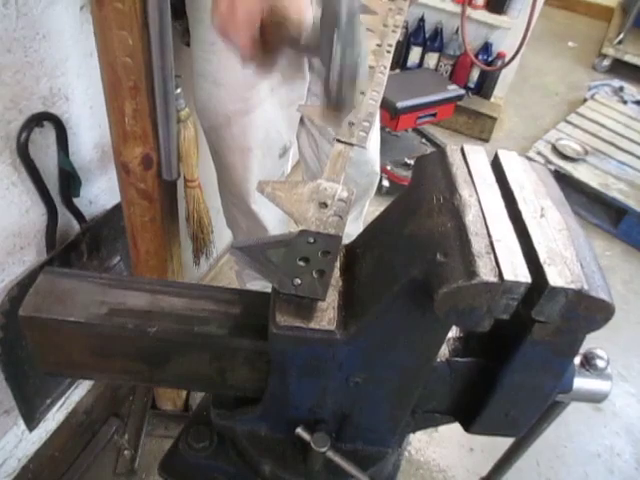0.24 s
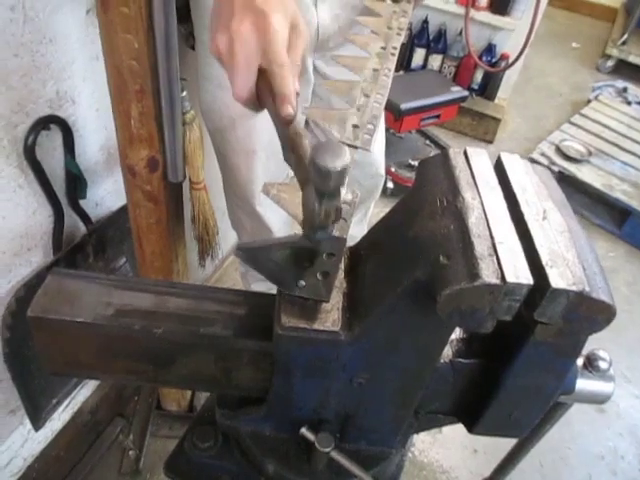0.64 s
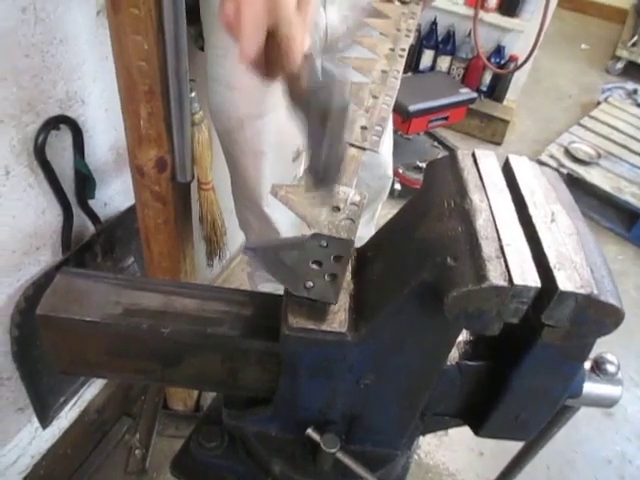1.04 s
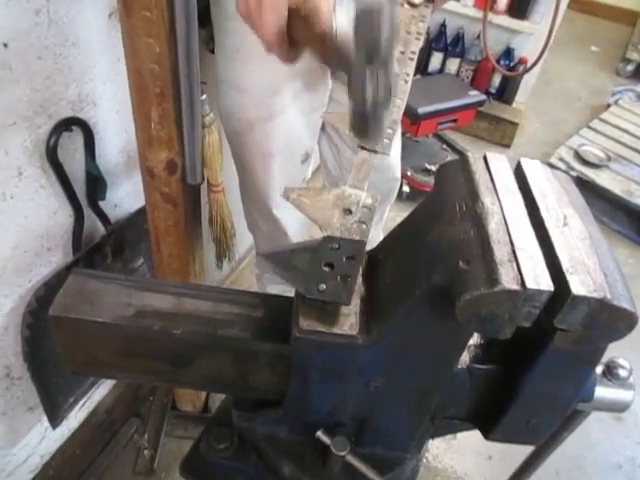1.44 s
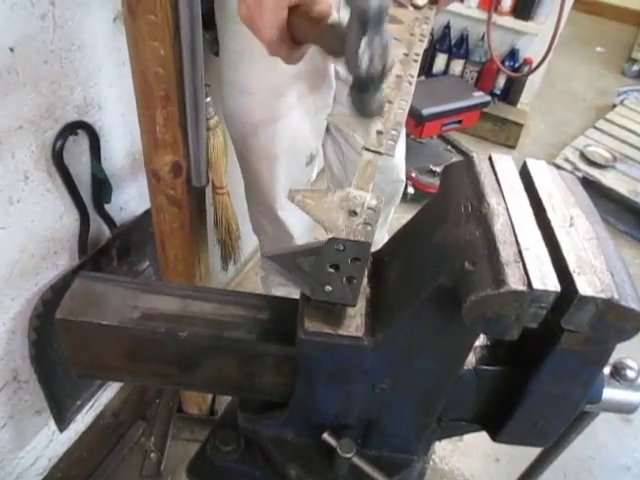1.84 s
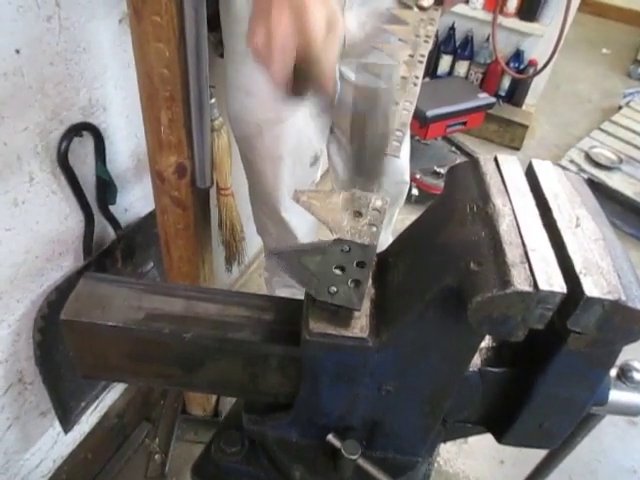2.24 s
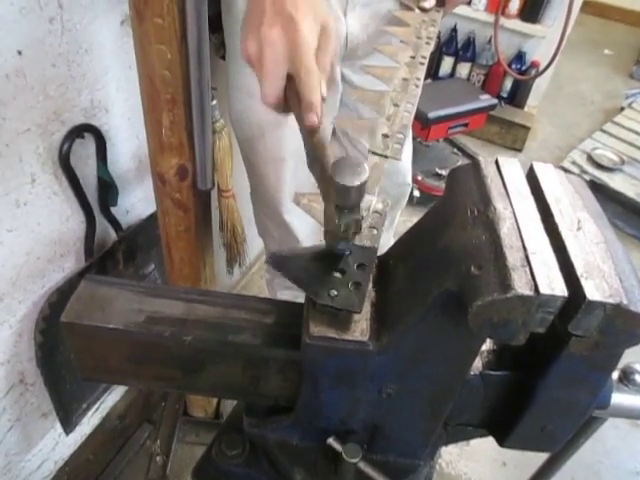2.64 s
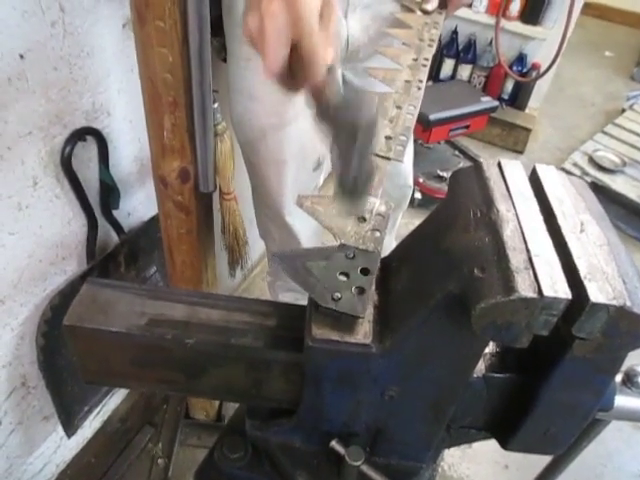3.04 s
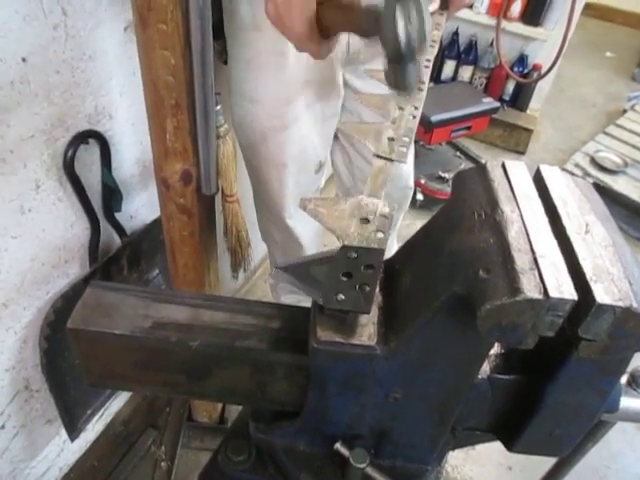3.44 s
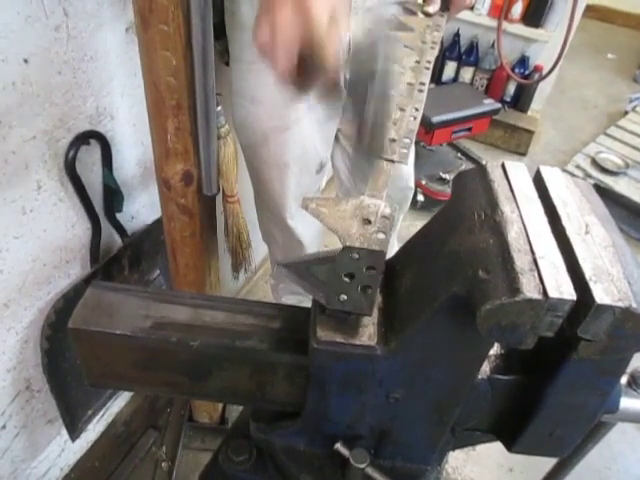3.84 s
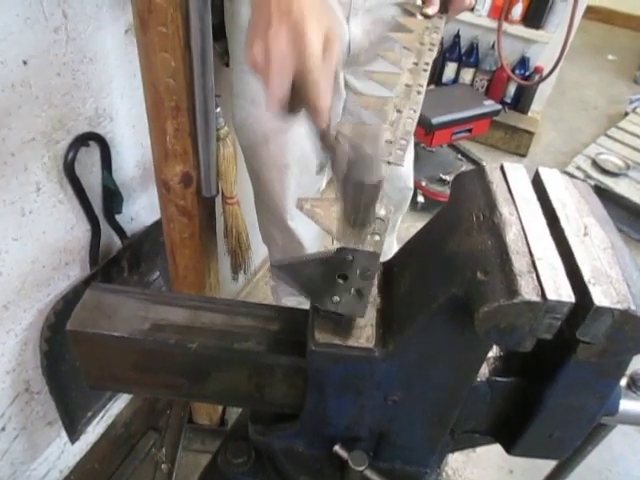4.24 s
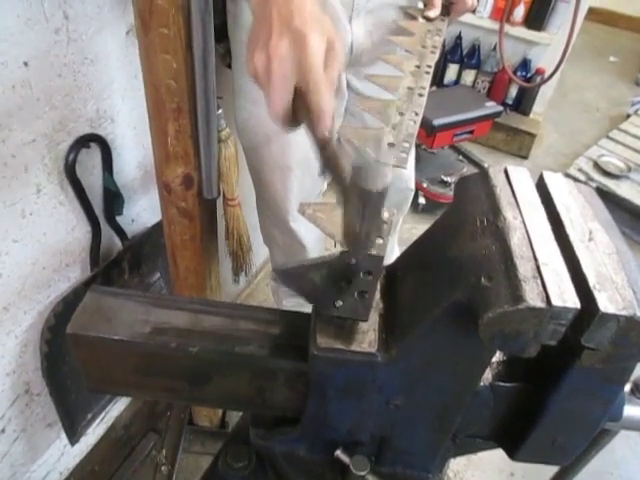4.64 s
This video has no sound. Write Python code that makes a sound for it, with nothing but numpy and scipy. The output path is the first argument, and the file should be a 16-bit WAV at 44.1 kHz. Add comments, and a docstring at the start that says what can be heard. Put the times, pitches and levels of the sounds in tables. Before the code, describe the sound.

A steel hammer beats a rivet in a blade resting on a heavy bench vise, roughly three blows a second. Each is a hard, bright crack with a short high ring and a low, solid thud beneath. The loose blade often slaps back with a small clink. Later blows rattle more. A hard-walled workshop answers each hit with overlapping reverberation; one close microphone, practically mono, faint hiss.

```python
"""Hard-walled workshop: a ball-peen hammer beats a steel rivet in a cutter blade laid on the flat of a bench vise.
Each blow is a filtered push with noise (crack), decaying sines (vise, bench, hammer head and blade)
and sparse ticks (chatter); the loose blade bounces and slaps back, and short scuffs precede some blows.
The room, decaying noise convolved with each blow, answers for most of a second.
A single microphone feeds both channels, over a faint hiss."""
import sys
import numpy as np
from scipy import signal
from scipy.fft import rfft, irfft
from scipy.io import wavfile
from scipy.ndimage import uniform_filter1d

SR = 44100
rng = np.random.default_rng(int(sys.argv[2]) if len(sys.argv) > 2 else 0)


def pcm_store(signal):
    """Save signal as 16-bit PCM."""
    levels = np.round(np.clip(np.atleast_2d(signal), -1, 1) * 32767)
    wavfile.write(sys.argv[1], SR, levels.astype(np.int16).T)


def invert_db(x):
    """Field ratio 10**(x/20) for x, a level in decibels (scalar or array-like)."""
    u = np.asarray(x, float) / 20
    return 10 ** u


N = 211486

# Hammer blows, the first still echoing at the start; levels relative.
# thud: how firmly the vise takes the blow; hardness: steel-on-steel sharpness; looseness: how free the blade sits;
# glance: how much the hammer skids, spraying noise instead of ring.
# start_s, crack_db, thud_db, hardness_db, looseness_db, glance_db
BLOW_EVENTS = [(-.29, -16, -24, -22, -6, -3), (0.0273, -20, -24, -4, -10, -0.5),
               (0.341, -11.5, -23.5, -13.5, -11, -10.5), (0.6481, -12.5, -25.5, -5, -17, -4.5),
               (0.9572, -13, -27.5, -5, -6, 1), (1.299, -12, -36, 0.5, 4, 11.5),
               (1.661, -9.5, -27, -5, -27, -2), (1.996, -14.5, -27.5, 0, -2, 3),
               (2.313, -10, -26, -1, -17, 1), (2.6313, -19.5, -28.5, 0, -2, -1),
               (2.95, -12.5, -28, -4.5, -4, 4.5), (3.279, -18, -29.5, 5, 8.5, 4),
               (3.6049, -11.5, -33.5, 2.5, 2, 11.5), (3.9263, -3, -31, 3, -10, 13),
               (4.3013, -13, -36, 1.5, 17.5, 3.5), (4.7003, -14, -33, 7, 4.5, 3.5)]
# Blade slapping back onto the vise: start_s, relative level_db, pitch_hz
SLAP_EVENTS = [(0.9853, -19.5, 3610), (1.3082, -42, 3020), (1.3382, -23.5, 4280), (1.346, -24.5, 4100),
               (1.697, -27.5, 3420), (1.706, -47, 3280), (2.0276, -21, 4180), (2.0402, -27.5, 4160),
               (2.347, -28, 3950), (2.6694, -67, 3220), (2.9756, -18, 4240), (3.3052, -28.5, 4600),
               (3.6104, -28, 3120), (3.9336, -22.5, 3030), (3.9533, -33, 4000), (4.3526, -23, 4010),
               (4.3595, -36, 3850), (4.7671, -37.5, 4380)]
# Short swelling scuffs of the steel just before some blows land: end_s, level_db
SCUFF_EVENTS = [(0.3422, -30), (1.2995, -48), (3.282, -48), (3.606, -35), (3.9265, -42), (4.7037, -21.5)]
# Hammer head and blade modes: pitch_hz, t60_s, twin_beat_hz
STEEL_MODES = [(1826, .5, 12), (2536, .07, 15), (4055, .06, 25), (4535, .55, 30), (6152, .2, 18),
               (6510, .12, 35), (8375, .3, 60), (10610, .12, 60), (11262, .15, 20), (12585, .12, 25),
               (12996, .15, 20), (13520, .1, 40)]
# Steel modes at zero hardness and looseness, in the same order: relative level_db
STEEL_LEVELS_DB = [-56.5, -45.5, -47, -60.5, -49.5, -41, -49, -50, -60.5, -63.5, -54.5, -67]
# Vise, bench and the room's lowest modes: pitch_hz, relative level_db, t60_s
BENCH_MODES = [(82, -13, 0.23), (129, -10, 0.22), (146, -9, 0.75), (159.3, -5.5, 0.47), (195.2, -3, 0.38),
               (210, -7.5, 0.9), (249.6, -4.5, 0.85), (279.6, -2.5, 0.58), (357, -8, 0.87),
               (402.5, -17, 1.6), (479, -8.5, 0.52), (622, -11, 0.73), (669, -5.5, 0.72), (703, -6, 1.03),
               (770, -2.5, 0.84), (783, -69, 0.11), (985, -1.5, 0.11)]
# Vise jaws and slide, quickly damped: pitch_hz, relative level_db, t60_s
VISE_MODES = [(274, -7.5, 0.075), (621, -7, 0.046), (760.6, -7, 0.05), (1194, -23, 0.2), (1426, -15, 0.023),
              (2077, -6.5, 0.023), (3280, -4.5, 0.033)]
# Crack filter: freq_hz, gain_db
CRACK_FILTER = [(40, -38.5), (120, -33), (270, -2), (500, 2), (760, 1.5), (1000, 4.5), (1300, 2.5),
                (1700, 3), (2120, 6.5), (3400, 8.5), (4400, 9.5), (5000, -1), (7000, -2.5), (12000, -16.5),
                (16000, -44)]
# Chatter and scuff spectrum: freq_hz, relative level_db
RATTLE_SPECTRUM = [(500, -7.5), (2000, -7), (3500, -2.5), (6000, -7), (10000, -9.5), (14000, -10),
                   (17000, -80)]
# Room decay: freq_hz, t60_s
ROOM_DECAY = [(100, 0.51), (420, 1), (1100, 0.63), (2900, 0.69), (7700, 0.57), (15000, 0.41)]
# Hiss common to both channels: freq_hz, relative density_db_per_hz
HISS_SPECTRUM = [(30, 2), (200, 1), (1000, -11), (5000, -13), (16000, -22.5)]
# Hiss of opposite sign in the two channels: freq_hz, relative density_db_per_hz
SIDE_HISS_SPECTRUM = [(100, -4), (1500, -9), (4000, -3), (8000, 2), (16000, 0)]
# Faint channel difference on spectral peaks, relative to the sound: freq_hz, gain_db
SIDE_GAIN = [(500, -56.5), (1400, -48), (2800, -68.5), (5600, -32), (10000, -22), (14000, -21)]

TOP_HZ = 15800
HISS_DB, SIDE_HISS_DB = -61.5, -69
# A mode at HARD_HZ follows hardness dB for dB; higher ones swing wider, by this power of pitch.
HARD_HZ, HARD_POWER = 7250, 0.43
BLADE_TOP_HZ = 2200  # modes below are the blade's, freed by looseness
PLACE_SD_DB = 4  # scatter from where the blow lands
KNOCK_OVER_THUD_DB = 11.5  # the vise's knock
SIZZLE_DB = -24  # splintering at zero glance
# Below, *_PER_LOOSE, *_PER_GLANCE and *_PER_SLAP are dB per dB; base values hold at zero.
CHATTER_DB, CHATTER_PER_GLANCE, CHATTER_PER_LOOSE = -40.5, 0.89, 0.5
SETTLE_S, SETTLE_PER_LOOSE = 0.019, 0.21  # chatter length
JOLT_DB, JOLT_PER_LOOSE = -36, 0.6
SLAP_KNOCK_DB, SLAP_KNOCK_PER_LOOSE = 3, 0.19
SLAP_SIZZLE_DB, SLAP_SIZZLE_PER_GLANCE = -8, 0.44
RERING_DB, RERING_PER_SLAP = 22, 0.66  # a slap rings the steel anew
TRAVEL_S = 0.00116  # to the microphone


def unit(x):
    """Scale to rms 1."""
    return x / np.sqrt(np.mean(x ** 2) + 1e-20)


def along(points, hz):
    """Interpolate (Hz, value) points on a log frequency axis."""
    f, v = np.transpose(points)
    return np.interp(np.log(hz + 1), np.log(f + 1), v)


def coloured(x, db_at):
    """Minimum-phase filter, via the folded cepstrum, with gain db_at(Hz)."""
    size = 4096
    gain = invert_db(db_at(np.fft.rfftfreq(size, 1 / SR)))
    cepstrum = irfft(np.log(gain), size)
    cepstrum[1:size // 2] *= 2
    cepstrum[size // 2 + 1:] = 0
    impulse = irfft(np.exp(rfft(cepstrum)), size)
    return signal.fftconvolve(x, impulse)[:len(x)]


def fade(t, t60_s):
    """Exponential decay, 60 dB in t60_s."""
    return invert_db(-60 * t / np.maximum(t60_s, .001))


def hiss(spectrum, level_db):
    """Steady background: Gaussian noise shaped to a spectrum, at a set rms."""
    return invert_db(level_db) * unit(coloured(rng.standard_normal(N), lambda hz: along(spectrum, hz)))


def room(x):
    """Echo by convolution with a fresh random noise tail for each blow, each frequency decaying at its own rate."""
    hz, t, z = signal.stft(rng.standard_normal(SR), SR, nperseg=256)
    decayed = z * fade(t, along(ROOM_DECAY, hz)[:, None])
    tail = signal.istft(decayed, SR, nperseg=256)[1][:SR]
    tail *= 1 - np.exp(-np.arange(SR) / SR / 0.00043)
    return signal.fftconvolve(x, tail / np.linalg.norm(tail))


def jolt(t, loose_db):
    """The microphone stand jumps: a short low sine, stronger with a loose blade."""
    level_db = JOLT_DB + JOLT_PER_LOOSE * loose_db
    return invert_db(level_db) * np.sin(2 * np.pi * 95 * t) * fade(t, 0.02)


def bench(t):
    """Heavy parts hum the same slightly unsteady modes at every blow."""
    hz, db, t60_s = np.transpose(BENCH_MODES)[..., None]
    size = invert_db(db + rng.normal(0, 0.31, hz.shape))
    walk = np.cumsum(rng.standard_normal((len(BENCH_MODES), len(t))), axis=1)
    drift = .012 * np.sqrt(hz / 500) * walk
    modes = size * fade(t, t60_s) * np.sin(2 * np.pi * hz * t + drift)
    return modes.sum(0) * (1 - np.exp(-t / 0.0017))


def graze(db, size):
    """Scuffed steel: a few ms of swelling noise."""
    scrape = unit(coloured(rng.standard_normal(size), lambda hz: along(RATTLE_SPECTRUM, hz)))
    return invert_db(db) * np.linspace(0, 1, size) * scrape


def chatter(t, loose_db, glance_db):
    """The loose blade clatters in sparse tiny ticks until it settles."""
    level_db = CHATTER_DB + CHATTER_PER_GLANCE * glance_db + CHATTER_PER_LOOSE * loose_db
    length_s = SETTLE_S * invert_db(SETTLE_PER_LOOSE * loose_db)
    struck = rng.random(len(t)) < .08
    ticks = struck * rng.standard_normal(len(t)) * invert_db(3 * rng.standard_normal(len(t)))
    ticks = unit(coloured(ticks, lambda hz: along(RATTLE_SPECTRUM, hz)))
    return invert_db(level_db) * ticks / (1 + (t / max(length_s, .005)) ** 5)


def slap(t, hz, loose_db, glance_db):
    """Flat steel on flat steel: a short bright clink in a burst of noise, no thump."""
    knock_db = SLAP_KNOCK_DB + SLAP_KNOCK_PER_LOOSE * loose_db
    sizzle_db = SLAP_SIZZLE_DB + SLAP_SIZZLE_PER_GLANCE * glance_db
    clink = np.sin(2 * np.pi * hz * t) * fade(t, 0.014) * (1 - np.exp(-t / 0.0005))
    tilt = [(300, knock_db - 60), (1600, knock_db), (4000, 0), (9000, sizzle_db + 7.0), (16000, sizzle_db - 16)]
    burst = fade(t, 0.035) * rng.standard_normal(len(t))
    return clink + 0.63 * coloured(burst, lambda f: along(tilt, f))


def mode_levels(hard_db, loose_db):
    """Hardness feeds high modes most, looseness the blade's low note; the landing place scatters all."""
    hz = np.transpose(STEEL_MODES)[0]
    place_db = PLACE_SD_DB * rng.standard_normal(len(hz))
    return STEEL_LEVELS_DB + hard_db * (hz / HARD_HZ) ** HARD_POWER + loose_db * (hz < BLADE_TOP_HZ) + place_db


def ring(t, mode_db):
    """Steel modes beat against detuned twins; phases wander at random, which broadens each line."""
    hz, t60_s, beat_hz = np.transpose(STEEL_MODES)[..., None]
    count = len(STEEL_MODES)
    wander = 0.026 * hz / 6000 * np.cumsum(rng.standard_normal((2, count, len(t))), axis=2)
    phase = wander + rng.uniform(0, 2 * np.pi, (2, count, 1))
    pair = np.sin(2 * np.pi * hz * t + phase[0])
    pair += 0.73 * np.sin(2 * np.pi * (hz + beat_hz) * t + phase[1])
    modes = invert_db(np.array(mode_db))[:, None] * fade(t, t60_s) * pair
    return modes.sum(0) * (1 - np.exp(-t / 0.00011))


def crack(t, bench_db, knock_db, sizzle_db):
    """Steel on steel: a sharp push, the damped vise and a few ms of splintering noise."""
    hz, db, t60_s = np.transpose(VISE_MODES)[..., None]
    hit = 0.079 * fade(t, 0.017) * rng.standard_normal(len(t))
    hit += 0.022 * (invert_db(db) * fade(t, t60_s) * np.sin(2 * np.pi * hz * t)).sum(0)
    hit[0] = -0.59  # push
    tilt = [(500, bench_db + 27), (1600, knock_db + 17.0), (4000, 0.025), (9000, sizzle_db + 14)]
    return coloured(hit, lambda f: along(CRACK_FILTER, f) + along(tilt, f))


def hammering():
    """Each blow, with the bounces that follow it, gets its own ring and echo."""
    lead = SR // 2  # samples ahead of time 0, also the length of one blow
    t = np.arange(lead) / SR
    out = np.zeros(N + 3 * SR)
    for start_s, db, thud_db, hard_db, loose_db, glance_db in BLOW_EVENTS:
        mode_db = mode_levels(hard_db, loose_db)
        # crack's tilt is relative to the blow's own level
        blow = crack(t, thud_db - db, thud_db + KNOCK_OVER_THUD_DB - db, SIZZLE_DB + glance_db - db)
        near = invert_db(db + 11.5) * blow + invert_db(8) * ring(t, mode_db) + chatter(t, loose_db, glance_db)
        near = np.pad(near, (0, lead))
        slaps = np.zeros(SR)
        for slap_s, slap_db, hz in SLAP_EVENTS:
            if 0 < slap_s - start_s < .15:
                at = round((slap_s - start_s) * SR)
                slaps[at:at + lead] += invert_db(slap_db + 1.5) * slap(t, hz, loose_db, glance_db)
                near[at:at + lead] += invert_db(RERING_DB + RERING_PER_SLAP * slap_db) * ring(t, mode_db)
        at = lead + round((start_s + TRAVEL_S) * SR)
        out[at:at + lead] += jolt(t, loose_db) + invert_db(thud_db - 10.5) * bench(t)
        out[at:at + SR] += near + slaps
        out[at:at + 2 * SR - 1] += room(invert_db(-3.5) * near + invert_db(-16.5) * slaps)
    for end_s, db in SCUFF_EVENTS:
        at = lead + round(end_s * SR)
        out[at - 140:at] += graze(db, size=140)
    return out[lead:lead + N]


def scene():
    """One microphone feeds both channels."""
    return np.tile(hammering() + hiss(HISS_SPECTRUM, HISS_DB), (2, 1))


def squash(x):
    """Soft saturation of the loudest peaks, toward 0.33."""
    return x / (1 + np.abs(x / .33) ** 3) ** (1 / 3)


def channel_difference(x):
    """Faint difference between channels, in quadrature, strongest on spectral peaks; plus a hiss of opposite
    sign in the two channels."""
    hz, _, z = signal.stft(x, SR, nperseg=512)
    power = np.abs(z) ** 2
    stands_out = power / (np.abs(uniform_filter1d(power, size=15, axis=0)) + 1e-20)
    quadrature = 1j * rng.choice([-1, 1], (len(hz), 1))  # random sign per frequency
    side = z * quadrature * stands_out ** 0.86 * invert_db(along(SIDE_GAIN, hz))[:, None]
    side = signal.istft(side, SR, nperseg=512)[1][:N]
    return side + hiss(SIDE_HISS_SPECTRUM, SIDE_HISS_DB)


def roll_off(x):
    """The treble ends steeply here."""
    return signal.sosfilt(signal.butter(12, 16830, fs=SR, output="sos"), x)


def record(dry):
    """Soft peaks, faintly differing channels, band limit and a small constant offset."""
    x = squash(dry)
    side = channel_difference(x[0])
    x = x + [side, -side]
    passed = np.fft.rfftfreq(N, 1 / SR) < TOP_HZ
    mix = irfft(rfft(x) * passed, N) - .0015
    return roll_off(mix)


dry = scene()
out = record(dry)
pcm_store(out)
```